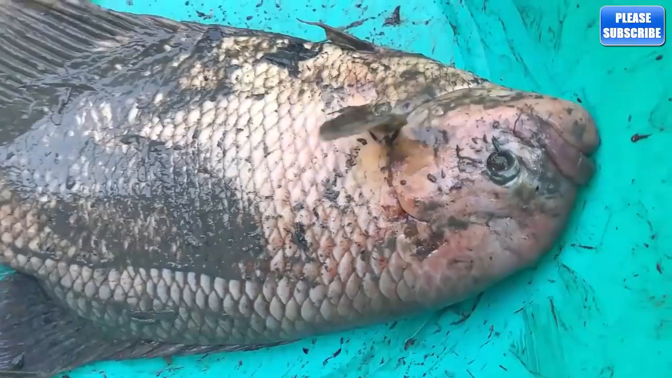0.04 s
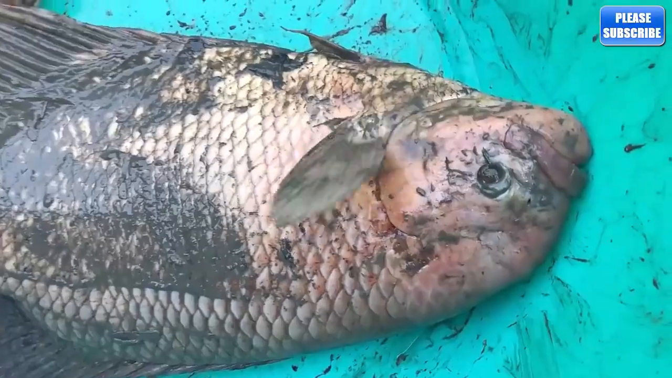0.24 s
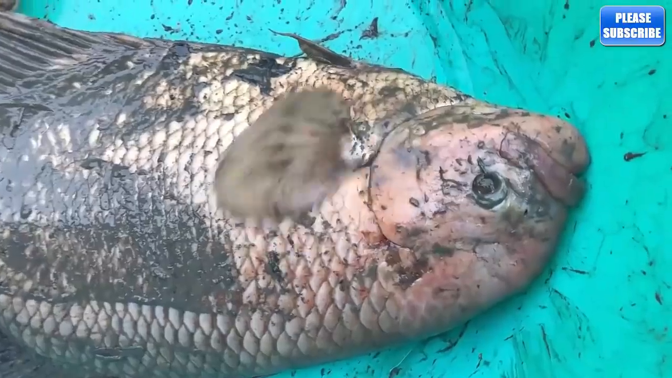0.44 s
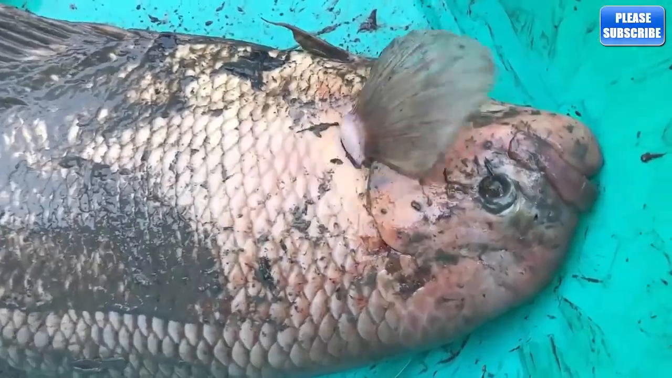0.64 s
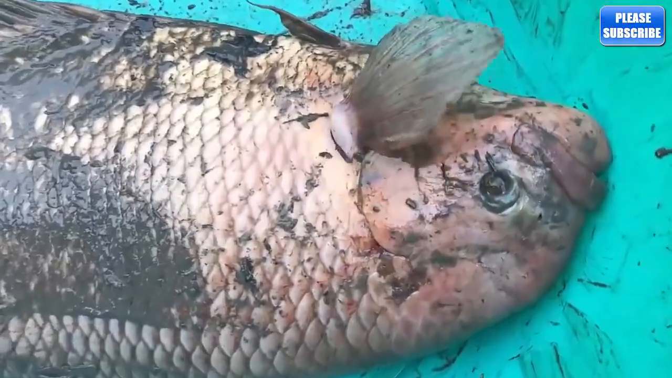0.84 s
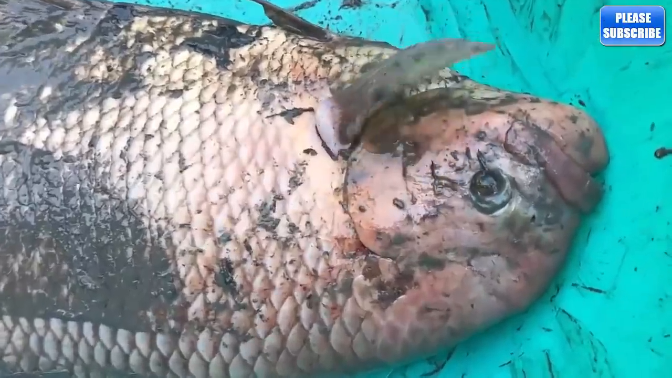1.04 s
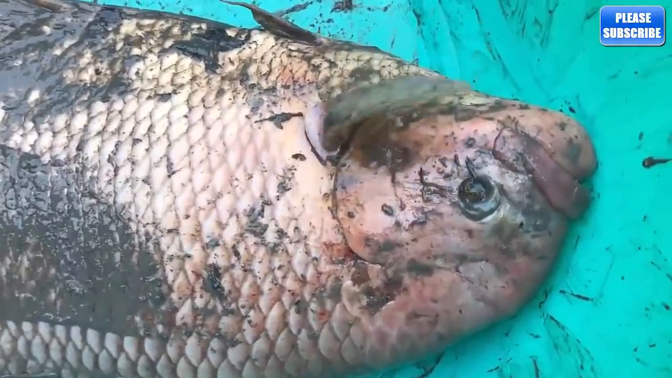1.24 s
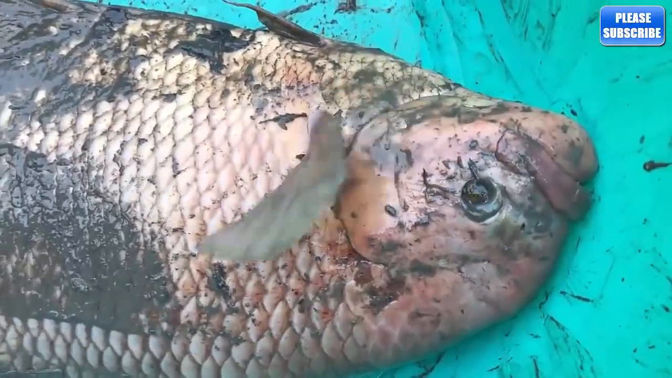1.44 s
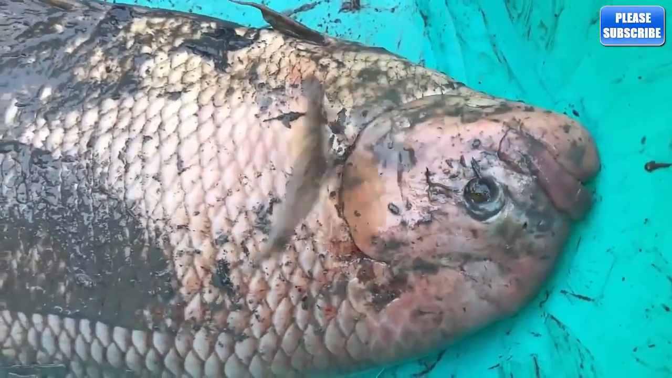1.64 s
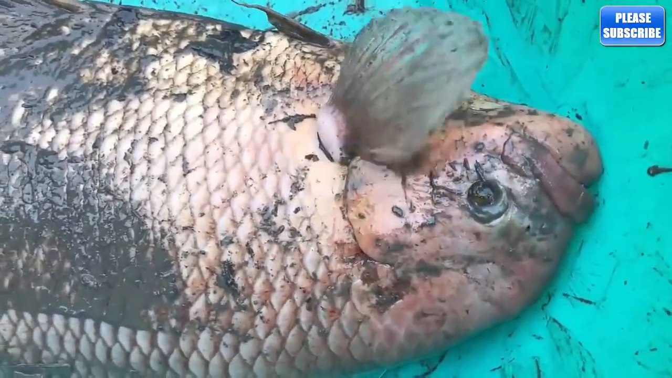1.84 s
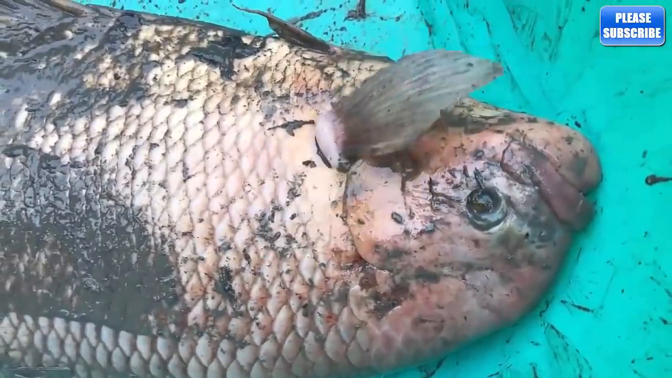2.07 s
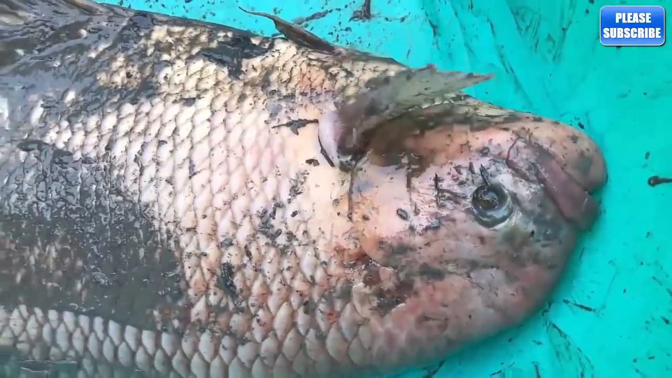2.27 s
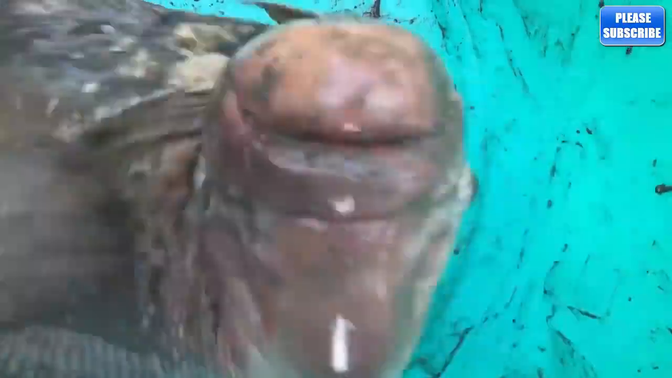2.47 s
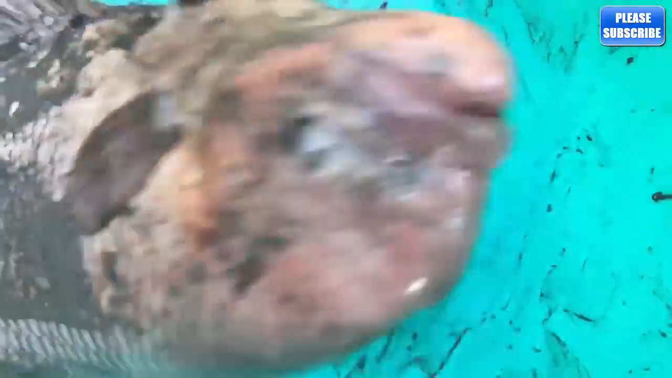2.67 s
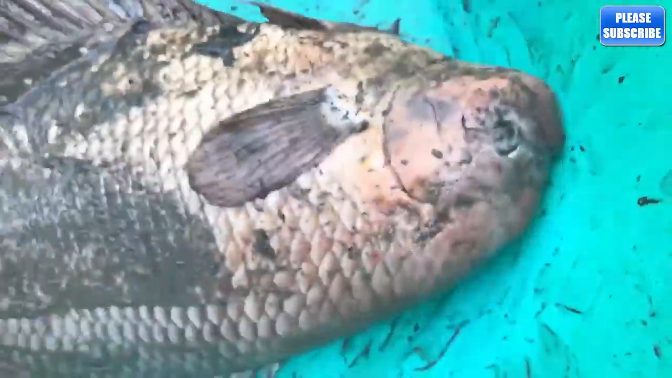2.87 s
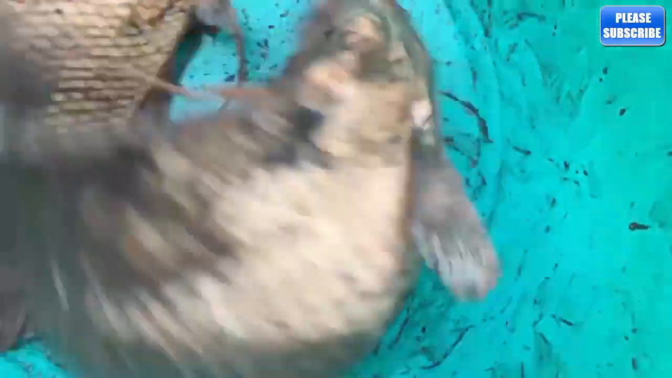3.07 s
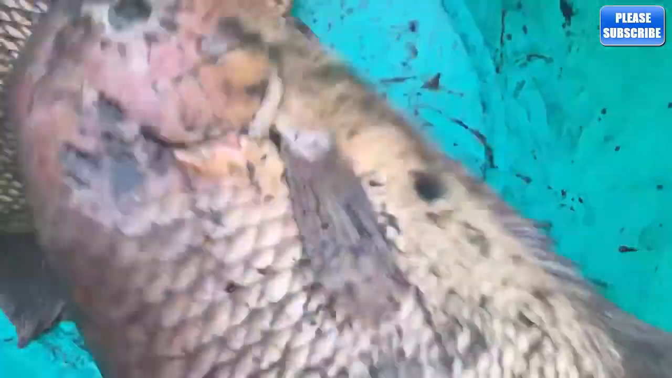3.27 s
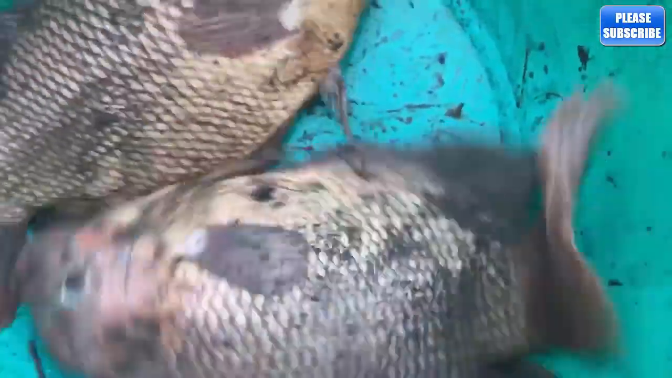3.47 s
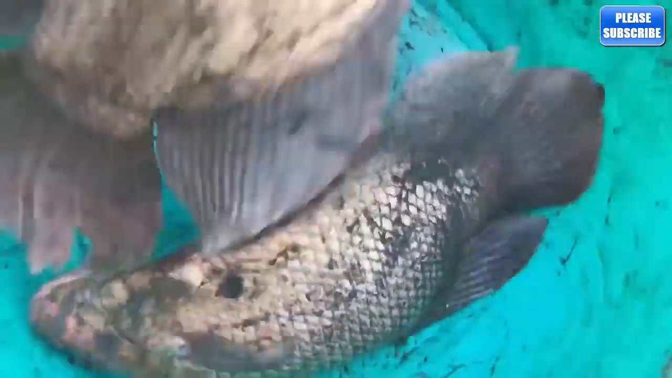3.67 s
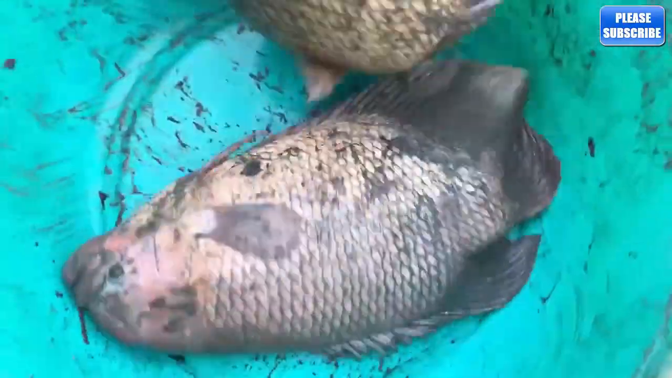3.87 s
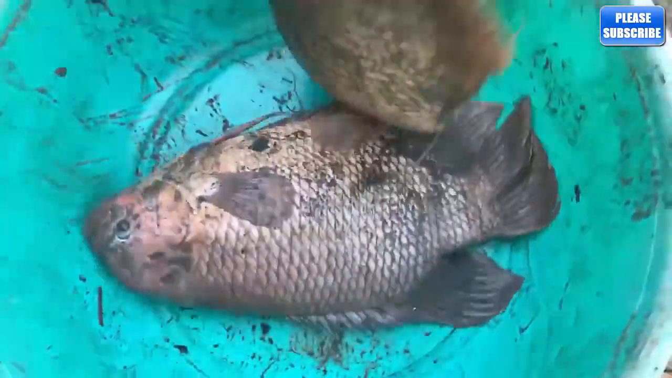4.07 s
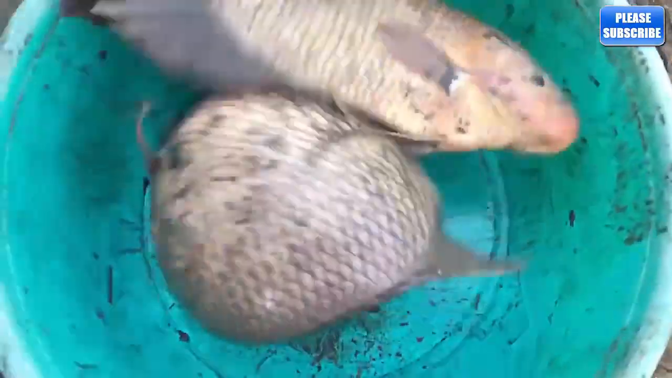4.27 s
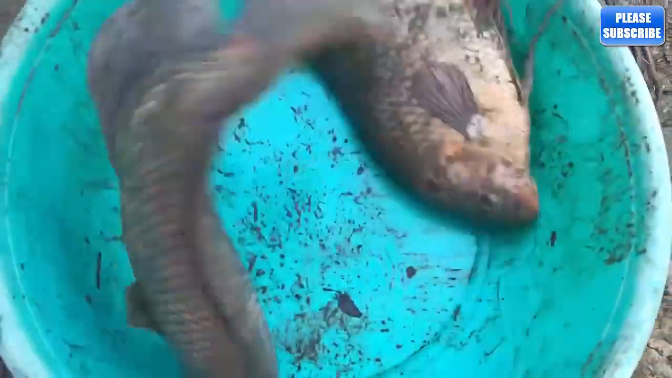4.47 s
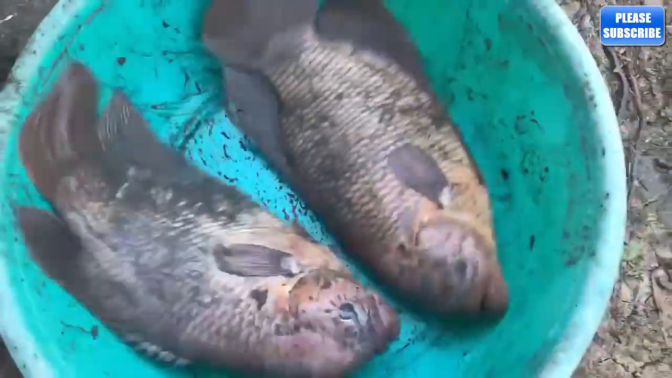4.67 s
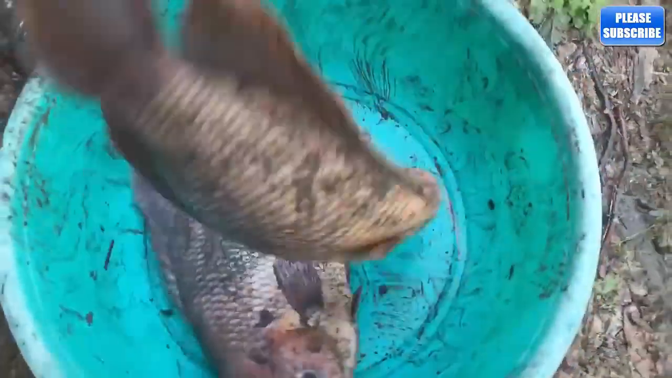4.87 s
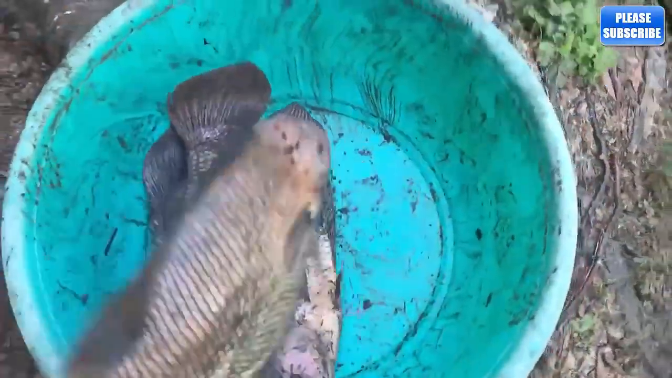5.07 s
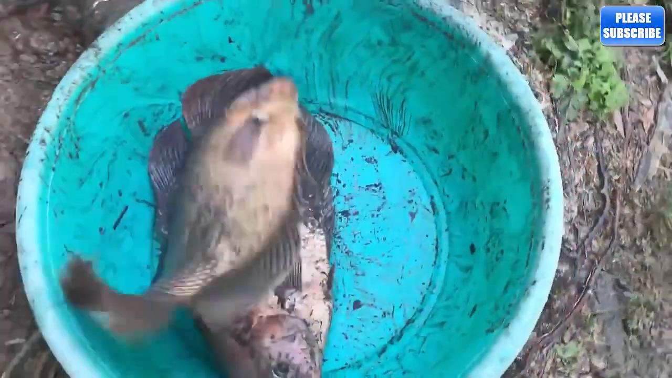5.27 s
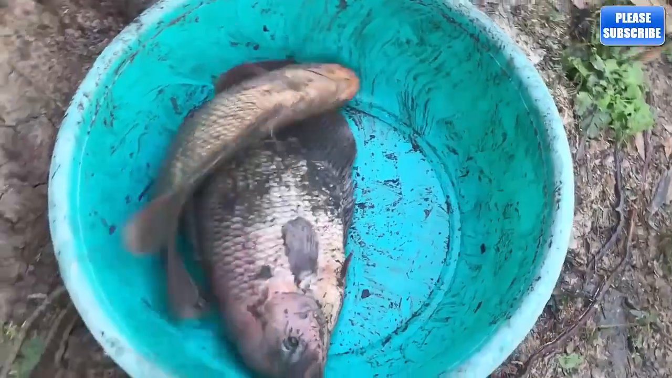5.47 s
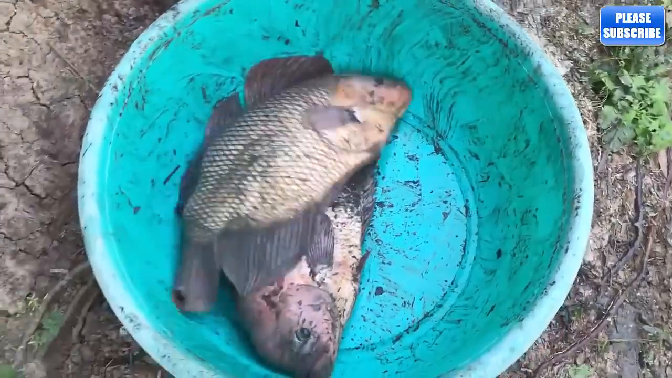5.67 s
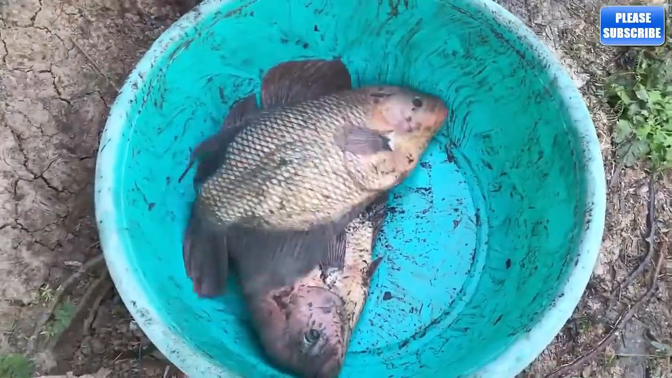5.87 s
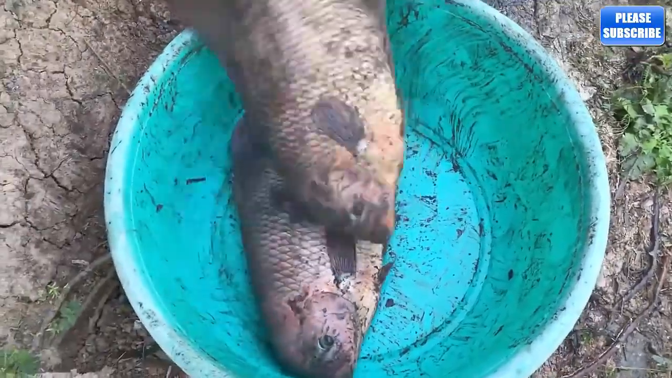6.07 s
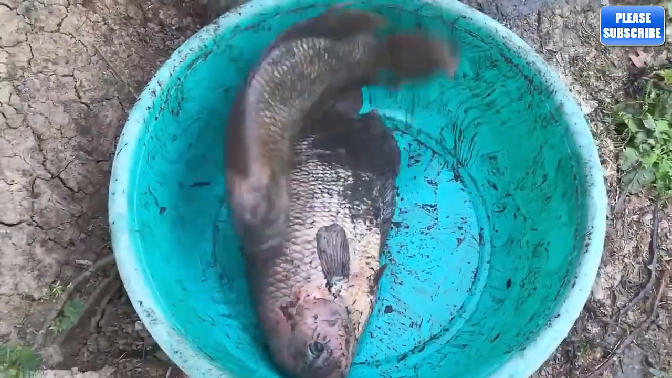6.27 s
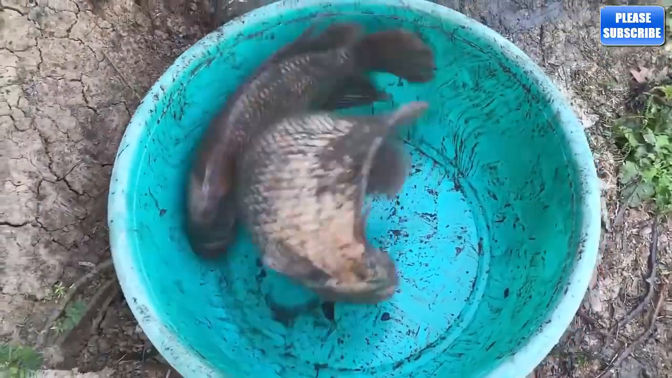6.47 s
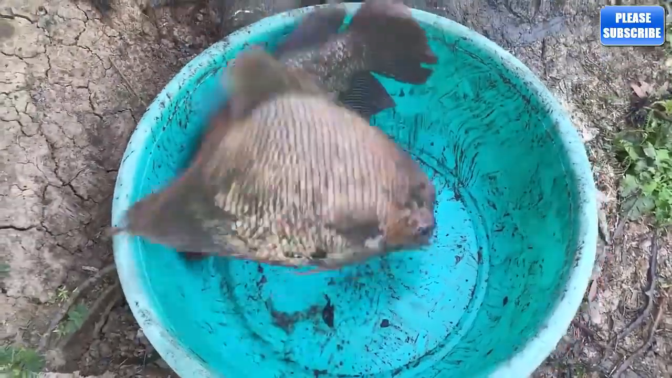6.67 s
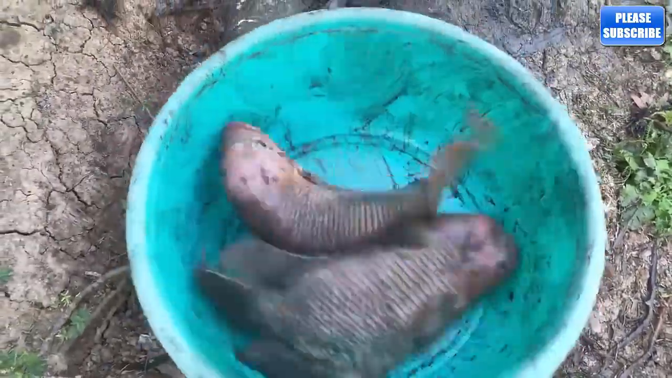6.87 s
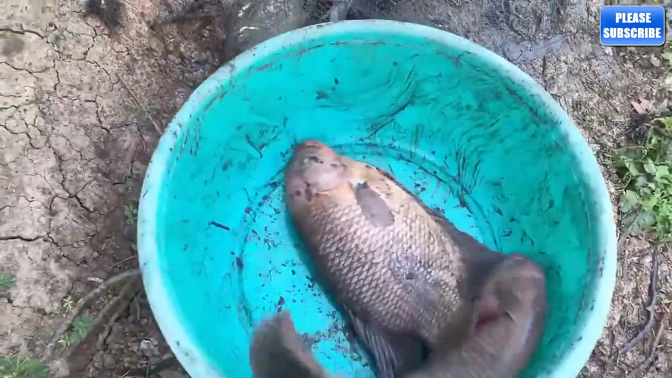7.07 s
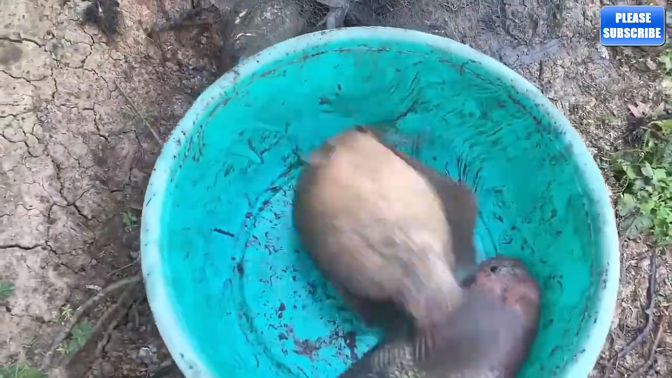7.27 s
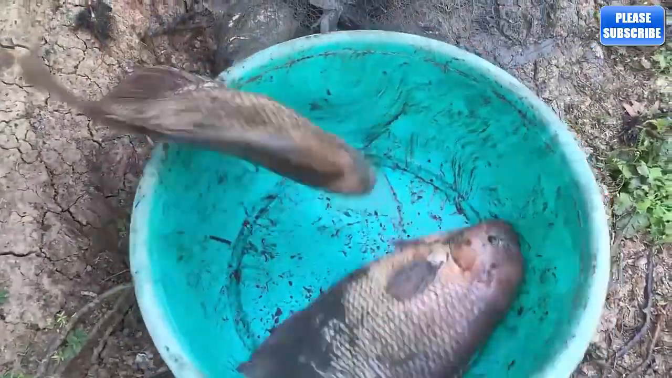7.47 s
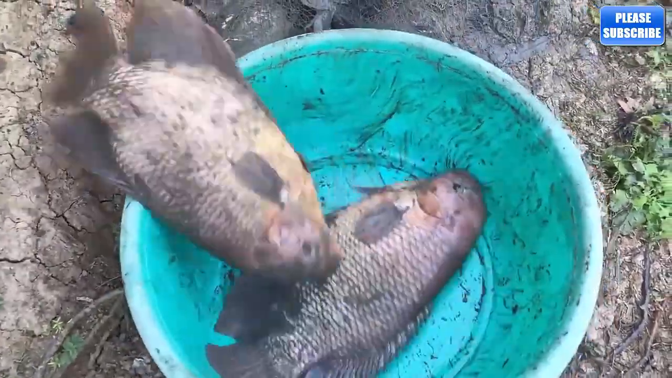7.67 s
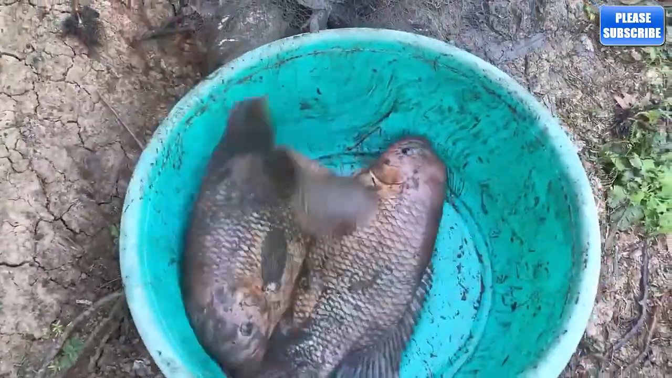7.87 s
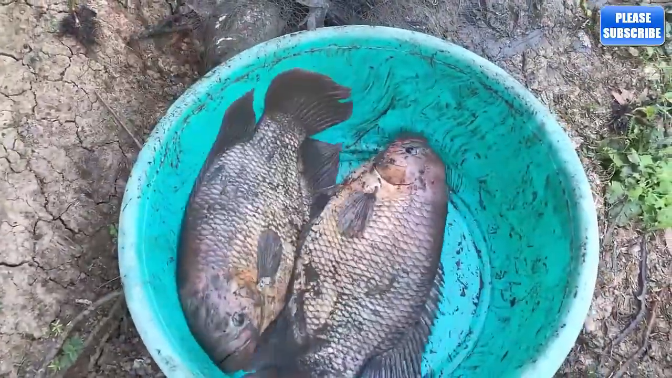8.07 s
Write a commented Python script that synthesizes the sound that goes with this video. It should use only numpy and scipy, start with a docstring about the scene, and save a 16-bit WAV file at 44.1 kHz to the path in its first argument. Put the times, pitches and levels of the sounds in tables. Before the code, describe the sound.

Outdoors, a quiet start: soft hiss, light wind mumbling on the microphone, tiny wet fin ticks and faint far bird calls. Then two heavy fish thrash in a plastic basin close by, with rapid sharp wet slaps, hollow wall knocks, scraping scales and low floor thuds. The flopping thins out briefly with small squelches, then returns in bursts until the end. Dry, close, single-channel sound, the loudest hits slightly squashed.

```python
"""Light wind mumbles on the microphone over outdoor hiss, a fin ticks and far birds call: filtered noise,
decaying rings and gliding sines. Then two big fish thrash in a plastic basin close by. Scales slide over
the plastic and wet tails and flanks slap the wall: patchy noise, part of it through the wall's modes.
Bodies thud on the floor (sagging damped sines); later come wet squelches, droplets and short high spits,
each noise in one broad resonance."""
import sys
import numpy as np
from scipy import signal
from scipy.fft import rfft, irfft, next_fast_len
from scipy.io import wavfile
from scipy.ndimage import uniform_filter1d, map_coordinates

SR = 44100
rng = np.random.default_rng(int(sys.argv[2]) if len(sys.argv) > 2 else 0)


def to_wav(sig):
    """Store sig (one row per channel, or 1-D mono) as 16-bit WAV at the path in sys.argv[1].

    Samples outside -1..1 are clipped; the rate is SR.
    """
    pcm = np.clip(np.atleast_2d(sig), -1, 1) * 32767
    pcm = np.round(pcm).astype(np.int16)
    wavfile.write(sys.argv[1], SR, pcm.T)  # frames by channels


N = 358091  # samples in the scene


def amp(db):
    """Amplitude is ten to the power of level/dB over 20."""
    return 10 ** (np.asarray(db) / 20)


def unit(x):
    """Normalisation by effective value: x scaled to rms 1."""
    return x / np.sqrt(np.mean(x ** 2) + 1e-20)


def wobble(rate):
    """Band-limited fluctuation: a smooth random curve with rate knots a second."""
    knots = rng.standard_normal(int(N * rate / SR) + 4)
    return map_coordinates(knots, [np.arange(N) * rate / SR])


def filtered(x, response):
    """Linear filtering: the spectrum of x times a complex response of frequency."""
    m = next_fast_len(N + SR // 2)
    spectrum = rfft(x, m) * response(np.fft.rfftfreq(m, 1 / SR))
    return irfft(spectrum, m)[:N]


def colour(points):
    """Spectral envelope: gain interpolated between (f/Hz, level/dB) points on a log frequency axis."""
    f, db = np.transpose(points)
    return lambda hz: amp(np.interp(np.log(hz + 1), np.log(f + 1), db))


def patchy(depth_db, size):
    """Non-stationary noise of rms 1: its short-time spectrum varies in random patches, small and large."""
    z = signal.stft(rng.standard_normal(N), nperseg=size)[2]

    def blur(count):
        over_frequency = uniform_filter1d(rng.standard_normal(z.shape), count, 0)
        return unit(uniform_filter1d(over_frequency, count, 1))

    field = blur(count=3) + blur(count=12)
    return unit(signal.istft(z * amp(depth_db * field), nperseg=size)[1][:N])


def add(track, s, sound):
    """Superposition: mixes a sound into the track at time s."""
    part = track[round(s * SR):][:len(sound)]
    part += sound[:len(part)]


def air():
    """Turbulence noise: steady outdoor hiss, and a low mumble of wind in lumps with a few stronger puffs."""
    # outdoor background spectrum: f/Hz, relative density level/dB per Hz
    air_spectrum = [(24, -47), (40, 3), (106, -3), (360, -15.5), (906, -15), (15600, -34.5)]
    # wind puffs on the microphone: t/s, level/dB before the puff's own shape
    puff_rows = [(0.641, -37.5), (0.839, -33), (2.042, -28.5)]
    hiss = amp(-55.5) * unit(filtered(patchy(.8, size=512), colour(air_spectrum)))
    wind = amp(-66 + 4 * wobble(12))
    t = np.arange(SR // 8) / SR
    for s, db in puff_rows:
        add(wind, s, amp(db) * (t / 0.016) * np.exp(-t / 0.012))

    def low_band(f):
        high_pass = (f / 60) ** 2 / (1 + (f / 60) ** 2)
        return high_pass / (1 + (f / 150) ** 4)

    mumble = unit(filtered(rng.standard_normal(N), low_band))
    return hiss + wind * mumble


def fin():
    """Damped oscillation: tiny wet ticks, each with its own pitch, and a fainter random patter."""
    # the clearer ticks: t/s, level/dB, ring f/Hz
    tick_rows = [ (1.753, -45, 2010), (2.1714, -33.5, 1260)]
    count = 45
    faint_s = rng.uniform(0, 2.4, size=count)
    faint_db = rng.normal(-51, 3, size=count)
    faint_hz = 4000 * amp(rng.normal(0, 4, size=count))
    rows = np.vstack([tick_rows, np.column_stack([faint_s, faint_db, faint_hz])])
    out, t = np.zeros(N), np.arange(300) / SR
    for (s, db, hz), draw in zip(rows, rng.standard_normal((len(rows), len(t)))):
        b, a = signal.iirpeak(min(hz, SR / 4), .9, SR)
        ring = np.sin(2 * np.pi * hz * t) + unit(signal.lfilter(b, a, draw))
        add(out, s, amp(db - 60 * t / 0.013) * ring)  # decays at 60 dB per 13 ms
    return out


def bird():
    """Frequency glide: thin far whistles and hoots are sines of moving pitch, their level flickering."""
    # calls: start t/s, end t/s, start f/Hz, end f/Hz
    chirp_rows = [(0.078, .158, 9600, 8400), (0.335, 0.41, 763, 740), (1.771, 1.965, 1630, 1520)]
    out = np.zeros(N)
    for start, end, from_hz, to_hz in chirp_rows:
        hz = np.linspace(from_hz, to_hz, round((end - start) * SR))
        whistle = np.sin(2 * np.pi * np.cumsum(hz) / SR)
        level = amp(-61.0 - hz / 2000)  # higher notes are fainter
        add(out, start, level * np.hanning(len(hz)) ** 0.36 * whistle)
    return out * amp(5.5 * wobble(90))


def wall(f):
    """Modal superposition: the damped resonances of the plastic wall, summed with alternating sign."""
    # basin wall modes: f/Hz, width/Hz, level/dB
    modes = [(234, 92, -3), (412.3, 37.8, 2), (592, 181, -2.5), (893, 280, -2.5), (1314, 610, -8.5)]
    total = 0
    for k, (centre, width, db) in enumerate(modes):
        resonance = 1j * f * width / (centre * centre - f * f + 1j * f * width)
        total = total + (-1) ** k * amp(db) * resonance
    return total


def rocking():
    """Mass-spring resonance: low noise in the broad resonance of the basin on the soil, rms 1."""
    return unit(filtered(rng.standard_normal(N),
                         lambda f: (1j * f * 70 / (75 ** 2 - f * f + 1j * f * 70)) ** 2))


def contact(force, knock, patch_db):
    """Forced vibration: wet skin smacks plastic with gritty treble, and a knock drives the wall's modes."""
    # smack spectrum: f/Hz, relative density level/dB per Hz
    wet_spectrum = [(530, -17.5), (900, -7), (2760, -5.5), (15600, -16)]
    grit = amp(1.92 * wobble(500))
    smack = unit(filtered(patchy(patch_db, size=256) * grit, colour(wet_spectrum)))
    dull = filtered(smack, lambda f: 1 / (1 + (f / 5000) ** 4))
    sizzle = smack - dull
    light = (force / (force + knock + 1e-9)) ** 0.81  # heavy, fleshy contacts lose their sizzle
    jolts = unit(patchy(patch_db, size=512) * grit ** 2)  # sparse jolts leave the wall free to ring
    ringing = filtered(jolts * knock, wall) / np.std(filtered(jolts, wall))
    return (dull + 1.38 * light * sizzle) * force + ringing


def blobs(count):
    """Bubble resonance: air pockets in the slime pop as short rings of scattered, rising pitch; rms 1."""
    starts = rng.uniform(0, N, count).astype(int)
    pitch, size = rng.standard_normal((2, count, 1))
    samples = np.arange(400)
    cycles = 2200 * amp(7 * pitch) * samples / SR
    ring = amp(5.6 * size - 5.9 * cycles) * np.sin(2 * np.pi * cycles * (1 + 0.034 * cycles))
    places = (starts[:, None] + samples).ravel()
    return unit(np.bincount(places, ring.ravel(), minlength=N)[:N])


def slide():
    """Stick-slip friction: scales scrape in uneven slips with wet pops; strokes swell, hold and fade."""
    # scales dragged over plastic: full from t/s, held t/s, hiss level/dB, wall rumble level/dB re the hiss
    stroke_rows = [(2.522, 0.0085, -19.5, -4.5), (2.734, 0.013, -22, -5.5), (2.917, 0.15, -34, -4),
                   (3.143, 0.029, -18, -9.5), (3.591, 0.074, -20.5, 0), (3.95, 0.044, -31, 2.5),
                   (4.27, 0.1, -23, -3), (4.41, 0.0079, -32.5, -41), (4.52, 0.077, -40.5, 13),
                   (4.707, 0.016, -23, 6.5), (4.789, 0.08, -27, -1.5), (5.198, 0.061, -36, 1),
                   (5.33, 0.17, -38.5, -43), (5.992, 0.073, -30.5, -11.5), (6.283, 0.049, -36, 0),
                   (6.488, 0.077, -29, 1), (6.846, .13, -28.5, 2), (7.585, 0.0073, -46.5, 8),
                   (7.73, 0.014, -43.5, -31)]
    # small squirming between strokes: t/s, hiss level/dB
    restless = [(2.28, -56), (2.85, -39), (3.25, -36.5), (5.1, -42), (5.9, -48), (6.2, -58), (6.73, -43.5),
                (7.2, -40.5), (8.12, -37.5)]
    rise_db_per_s, fall_db_per_s = 402, 399
    restless_rumble_db = 0.5  # re its hiss
    t = np.arange(N) / SR
    push = amp(np.interp(t, *np.transpose(restless), left=-120))
    load = amp(restless_rumble_db) * push
    for s, held, db, rumble_db in stroke_rows:
        before, after = np.maximum(s - t, 0), np.maximum(t - s - held, 0)
        away_db = rise_db_per_s * before + fall_db_per_s * after
        push = push + amp(db - away_db)
        load = load + amp(db + rumble_db - away_db)
    slips = amp(2.0 * wobble(110))
    hiss, rumble = push * slips, load * slips
    shake = amp(-6.5) * uniform_filter1d(rumble, size=800) * rocking()
    pops = amp(-12.0) * push * blobs(count=2500)
    return contact(hiss, rumble, patch_db=2.5) + pops + shake


def slaps():
    """Impact excitation: a crack at first touch, a rise (slower for long slaps), a fall as skin peels off."""
    # slaps on the wall: t/s, smack level/dB, time to fall 7 dB/ms, wall knock level/dB re the smack
    slap_rows = [(2.351, -28.5, 2.65, 11.5), (2.375, -42, 3.9, 17.5), (2.513, -20.5, 6.6, 6),
                 (2.573, -12.5, 3, -6), (2.707, -15.5, 3.7, -0.5), (2.872, -12.5, 5.6, 9.5),
                 (3.118, -10.5, 7, 0.5), (3.216, -25.5, 3.3, 9.5), (3.339, -6, 8, 3), (3.53, -10.5, 4, 1),
                 (3.541, -10.5, 6.5, 4), (3.579, -23.5, 9.4, 10), (3.596, -8, 6, 5.5),
                 (3.640, -7, 3.4, -10), (3.654, -20, 5.8, 8), (3.748, -10, 6.3, -1.5),
                 (3.876, -34.5, 4.2, 18), (4.007, -3.5, 9.1, 3), (4.126, -23, 1.6, -3),
                 (4.157, -19, 1, -32), (4.247, -5, 6.7, 0), (4.287, -21.5, 8.8, 19.5),
                 (4.502, -25.5, 5.6, 15), (4.519, -11, 9.5, 2), (4.55, -12, 7.3, 1.5),
                 (4.6, -28.5, 4.3, 11.5), (4.695, -24, 14.6, 22.5), (4.813, -4.5, 3.7, 5),
                 (4.834, -21.5, 8, 16), (4.951, -13.5, 6, 5), (4.972, -10, 9.9, 3), (5.198, -21.5, 8.9, 0),
                 (5.249, -20.5, 10, 2), (5.304, -21, 6.5, -1), (5.454, -10.5, 6.5, -8.5),
                 (5.99, -16, 13.3, -10), (6.034, -17, 8.9, 3), (6.071, -20, 4.5, -5),
                 (6.229, -19, 8.3, 8.5), (6.268, -19.5, 4, 3.5), (6.475, -21.5, 4.6, 1.5),
                 (6.518, -21, 4.6, 4.5), (6.791, -21, 4.4, 2), (6.846, -9, 6.9, -3.5),
                 (6.876, -23.5, 11, 21), (6.925, -22, 10, 16.5), (6.962, -41, 4, -13),
                 (7.019, -29, 7.4, 16.5), (7.069, -13, 13, 3), (7.130, -9, 8.5, -2),
                 (7.231, -20, 13.4, 6.5), (7.314, -22, 13.6, 11), (7.384, -18, 11.8, -29),
                 (7.51, -23.5, 2.8, 6), (7.849, -9, 1.8, -1.5), (7.951, -14, 4.8, -3),
                 (8.046, -15, 9.6, 7.5), (8.094, -13, 8.1, -1)]
    force, knock = np.zeros(N), np.zeros(N)
    ms = np.arange(0, 120, 1000 / SR)
    for s, db, fall_ms, knock_db in slap_rows:
        rise_ms = 0.0033 * fall_ms ** 3
        body = (1 - np.exp(-ms / rise_ms)) * amp(-7 * ms / fall_ms)
        crack = 2.0 / fall_ms * np.exp(-ms / 0.11)
        add(force, s, amp(db) * (body + crack))
        add(knock, s, amp(db + knock_db) * (body + crack))
    return contact(force, knock, patch_db=2.0)


def thuds():
    """Loaded-plate oscillation: the floor bounces, its pitch sagging as the weight settles; the wall
    rings and the basin rocks on the ground."""
    # bodies landing: t/s, relative level/dB, nominal f/Hz of the loaded floor
    thud_rows = [(2.59, -7.5, 104), (2.677, -8.5, 133), (2.709, -6, 218), (2.739, -14, 90),
                 (2.885, -2, 108), (3.122, -1.5, 168), (3.248, -5.5, 159), (3.358, -3.5, 195),
                 (3.551, -4, 101), (3.616, -11, 139), (3.718, -5.5, 122), (3.883, -4.5, 144),
                 (3.97, 0.5, 231), (4.289, -0.5, 175), (4.317, -4.5, 155), (4.513, -7, 176),
                 (4.709, -3, 187), (4.827, -6.5, 178), (4.938, -15, 151), (5.409, -19.5, 224),
                 (6.23, -19, 326), (6.495, -16.5, 100), (6.849, -8, 230), (6.925, 0, 205),
                 (7.009, -13, 106), (7.078, -7, 220), (7.327, -10.5, 219), (7.509, -16, 280),
                 (7.539, -14, 203)]
    floor, blows, jolts = np.zeros(N), np.zeros(N), np.zeros(N)
    t = np.arange(SR // 5) / SR
    draws = rng.standard_normal((len(thud_rows), 2))
    for (s, db, hz), (sign, bend) in zip(thud_rows, draws):
        # pitch sags from 1.161 to 0.841 times nominal
        cycles = hz * (0.841 * t + 0.0064 * (1 - np.exp(-t / 0.02)))
        overtone = 0.22 * np.sin(2 * np.pi * 2.237 * cycles + bend)
        swing = np.sin(2 * np.pi * cycles) + overtone
        envelope = amp(db + 8.5 - 9.06 * cycles) * (1 - np.exp(-cycles / 0.94))
        add(floor, s, np.sign(sign) * envelope * swing)
        add(jolts, s, amp(db - 5.5) * np.hanning(SR // 700))
        add(blows, s, amp(db - 8.0 - 60 * t / 0.18) * (1 - np.exp(-t / 0.0058)))
    uneven = amp(1.5 * wobble(60))
    return floor * uneven + blows * rocking() + filtered(jolts, wall)


def squelch():
    """Resonant filtering: wet squelches, droplets and short high spits, noise in one broad resonance each."""
    # wet squelches, droplets and short high spits: t/s, length/ms, f/Hz, level/dB
    squelch_rows = [(4.18, 59, 3720, -21.5), (4.193, 45, 1480, -23.5), (4.626, 5, 6440, -28),
                    (5.32, 94, 5200, -31), (5.56, 40, 1100, -38), (5.628, 24, 820, -33),
                    (5.761, 95, 3740, -34.5), (6.542, 37, 11700, -21.5), (6.613, 16, 8900, -39),
                    (6.92, 8.2, 8000, -26), (6.942, 8.6, 11000, -18)]
    out = np.zeros(N)
    draws = rng.standard_normal((len(squelch_rows), SR // 10))
    for (s, ms, hz, db), draw in zip(squelch_rows, draws):
        swell = np.hanning(round(ms * SR / 1000)) ** 0.89
        b, a = signal.iirpeak(hz, 2.2, SR)
        hiss = unit(signal.lfilter(b, a, signal.lfilter(b, a, draw)))
        add(out, s, amp(db) * swell * hiss[:len(swell)])
    return out


def scene():
    """Superposition of all sources in one channel."""
    return (air() + fin() + bird() + slide() + slaps() + thuds() + squelch())[None]


def record(dry):
    """Saturation and band limiting: the input stage rounds off the loudest peaks and trims both ends
    of the spectrum."""
    top_hz, bass_corner_hz = 15750, 35
    soft = dry[0] / (1 + np.abs(dry[0] / .9) ** 4) ** (1 / 4)
    return filtered(soft, lambda hz: (hz < top_hz) * hz ** 2 / (hz ** 2 + bass_corner_hz ** 2))[None]


dry = scene()
out = record(dry)
to_wav(out)
```